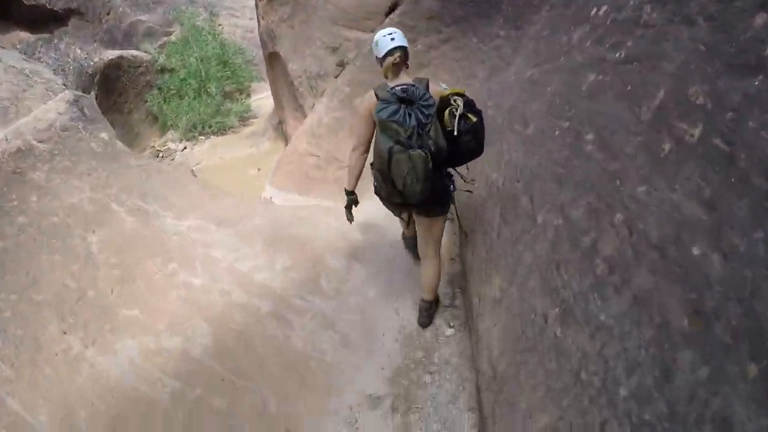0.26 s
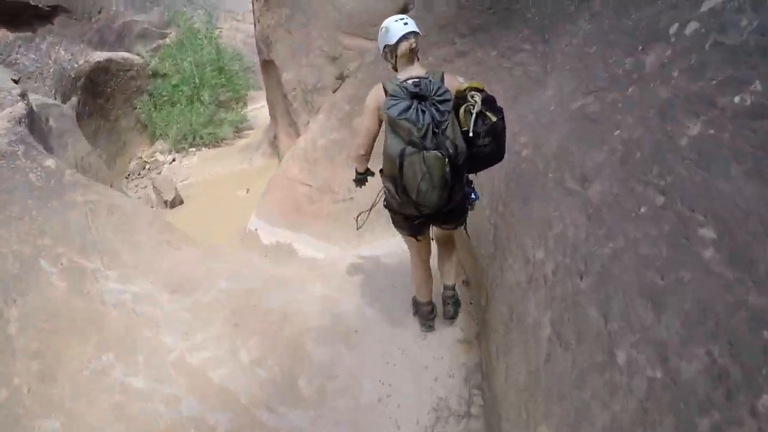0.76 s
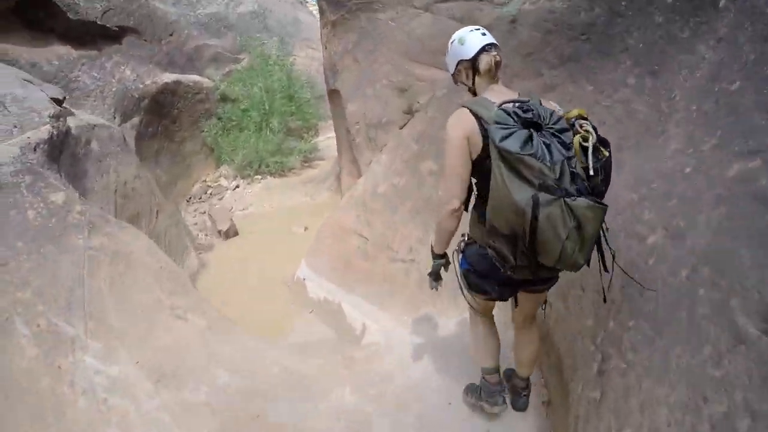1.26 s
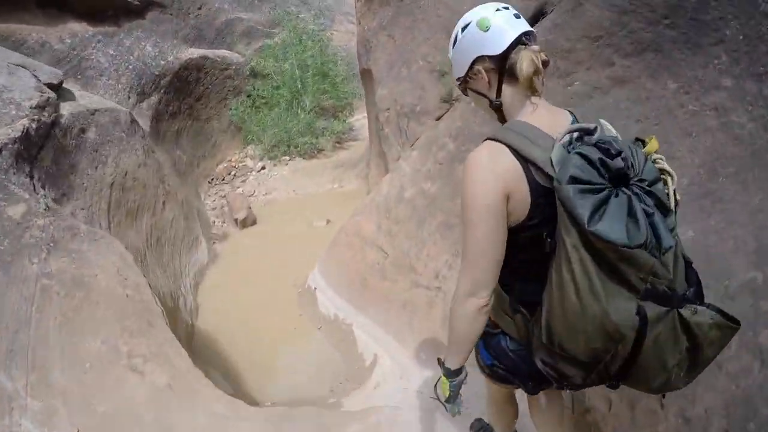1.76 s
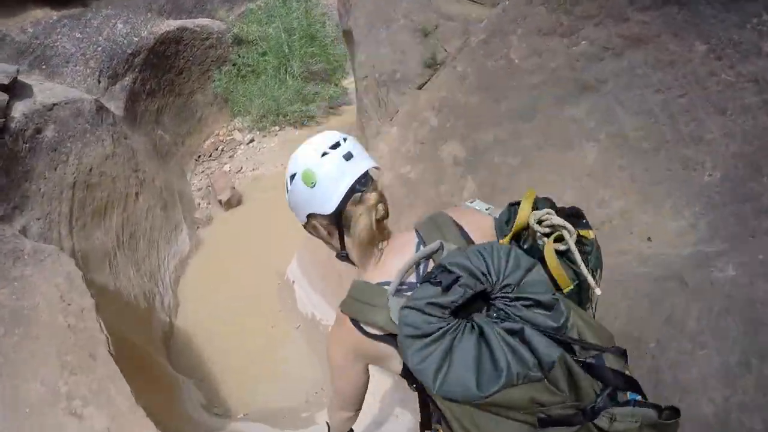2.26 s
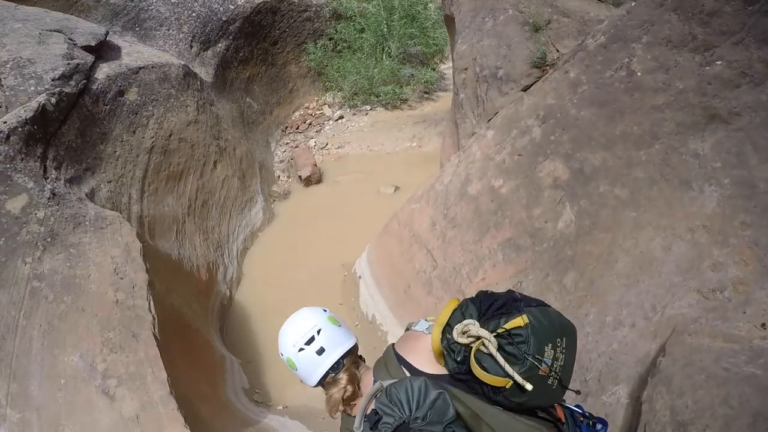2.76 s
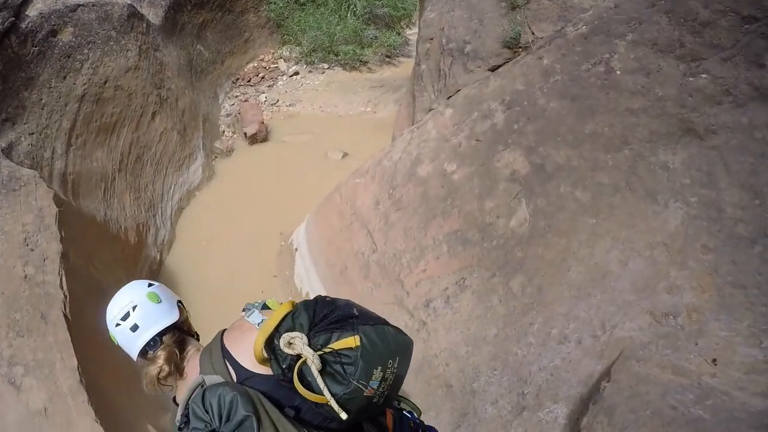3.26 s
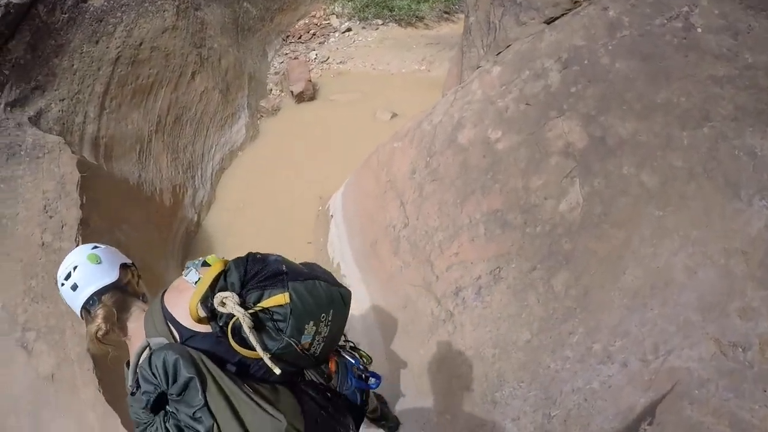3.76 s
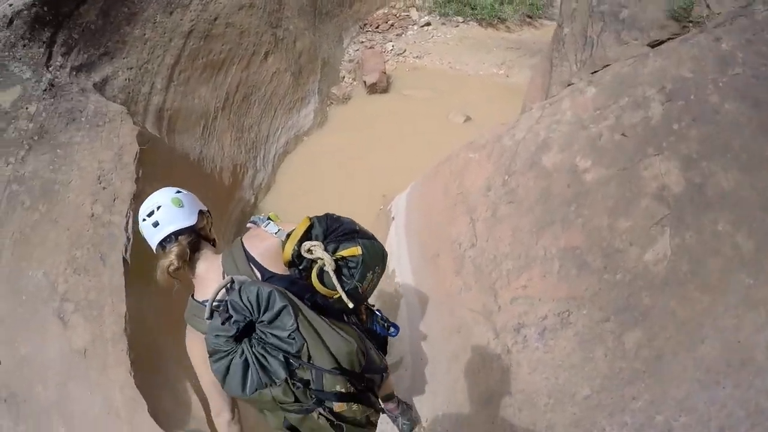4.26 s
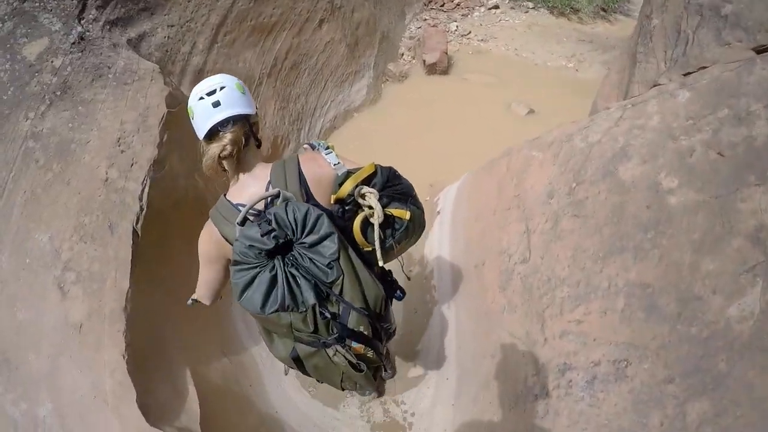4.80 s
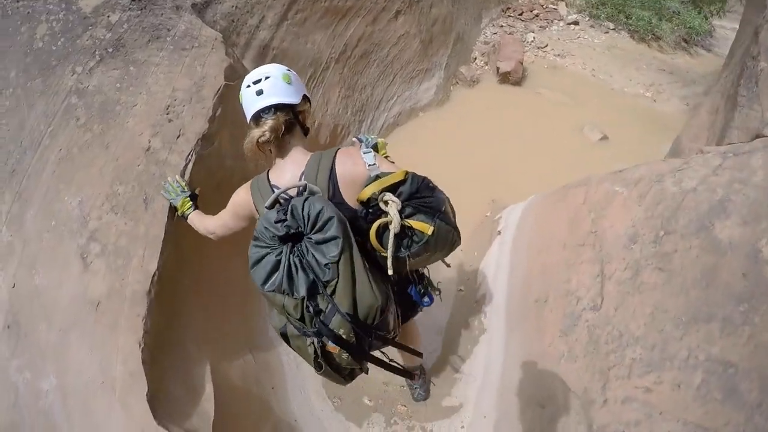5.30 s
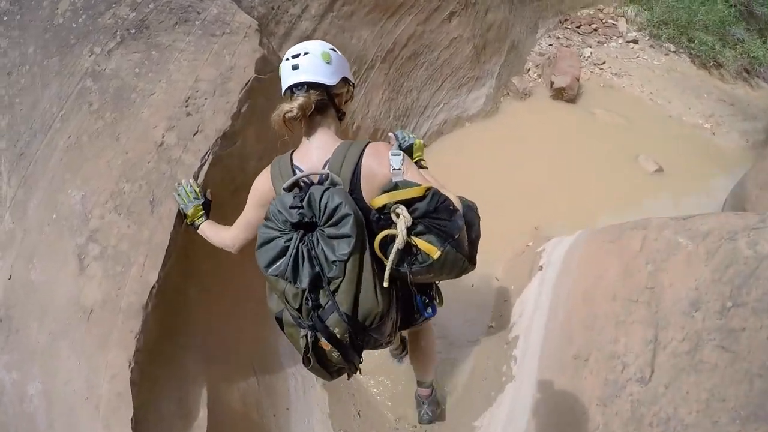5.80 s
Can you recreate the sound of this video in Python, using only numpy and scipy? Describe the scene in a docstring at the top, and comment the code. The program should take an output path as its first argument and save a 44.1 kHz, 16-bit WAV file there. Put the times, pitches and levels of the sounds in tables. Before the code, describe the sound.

Low footstep thumps and scuffing on rock, with a few gear clinks, light gravel crunches and faint bubbles near the end.

```python
"""Hikers in a sandstone canyon

Two hikers step down to a muddy pool, heard by a helmet camera in a closed housing. The wearer's footfalls
shake the mount at very low pitch. Friction of soles and packs, and small knocks, excite the housing's
resonances; metal gear clinks in its own modes, gravel crunches, and a few bubbles ring at the pool.
Under it all lie the canyon air and the hiss and whine of the electronics."""
import sys
import numpy as np
from scipy import signal
from scipy.fft import rfft, irfft
from scipy.io import wavfile
from scipy.ndimage import uniform_filter1d

SR = 44100
rng = np.random.default_rng(int(sys.argv[2]) if len(sys.argv) > 2 else 0)


def dump(signal):
    """Clip the signal to [-1, 1] and save it as 16-bit WAV at the path in sys.argv[1]."""
    limited = np.clip(np.atleast_2d(signal).T, -1, 1)
    pcm = np.round(limited * 32767).astype(np.int16)
    wavfile.write(sys.argv[1], SR, pcm)


N = 266364

# Jolts of the mount as the wearer lands or shifts weight. Each row: peak time in seconds, sway level
# in dB, sway pitch in Hz, rattle level in dB, sway decay time (t60, to fall 60 dB) in seconds.
MOUNT_JOLTS = [(0.0, -23.5, 31.4, -29, 0.27), (0.08, -35, 30.2, -57, 0.25), (0.16, -50, 28.9, -41.5, 0.078),
               (0.42, -51.5, 29.2, -59, 0.13), (0.553, -19, 28, -39, 0.45),
               (0.587, -13.5, 28.95, -27.5, 0.085), (0.79, -68, 29.73, -76, 0.35),
               (1.02, -51, 32.25, -48, 0.22), (1.113, -18.5, 30.4, -42, 0.28),
               (1.17, -22, 31.9, -25.5, 0.26), (1.39, -53, 35.1, -60, 0.35), (1.492, -39, 31.76, -37, 0.72),
               (1.595, -24, 32.2, -32.5, 0.28), (1.7, -20.5, 27.2, -39.5, 0.088),
               (1.94, -46, 29.12, -49, 0.32), (2.075, -32, 29.25, -46, 0.87),
               (2.146, -21, 28.2, -32.5, 0.13), (2.238, -27.5, 29.97, -64, 0.087),
               (2.439, -51, 29.37, -60, 0.15), (2.56, -48, 26.1, -56, 0.22), (2.692, -40, 26.6, -38.5, 0.4),
               (2.89, -60, 23.4, -57, 0.41), (3.088, -53, 27.94, -80, 0.2), (3.232, -63, 27.9, -43.5, 0.48),
               (3.351, -53.5, 26.2, -39.5, 0.35), (3.548, -29.5, 26.76, -43.5, 0.11),
               (3.666, -27.5, 25.02, -36, 0.048), (3.73, -36, 23.84, -48, 0.13),
               (3.969, -43, 28, -55, 0.069), (4.1, -31, 29.1, -37.5, 0.098), (4.21, -47, 29.73, -61, 0.47),
               (4.325, -38.5, 28, -54, 0.19), (4.608, -36.5, 29.7, -51, 0.19),
               (4.697, -13.5, 31.2, -26.5, 0.12), (4.978, -44, 31.43, -60, 0.056),
               (5.06, -41, 31.1, -59, 0.41), (5.165, -30, 31.05, -50, 0.083), (5.3, -51.5, 30.7, -54, 0.53),
               (5.43, -46.5, 28.68, -54, 0.31), (5.541, -42, 26.25, -39, 0.5),
               (5.68, -35.5, 24.84, -49, 0.072), (5.96, -44, 24.74, -84, 0.15)]
# Spectra of the mount's rattle, of grit, and of canyon air with microphone hiss.
# Each row: frequency in Hz, relative spectral density in dB.
RATTLE_SPECTRUM = [(38, -31), (48, 2), (65, -0.5), (90, -5), (110, -19.5), (130, -27), (200, -26)]
GRIT_SPECTRUM = [(4200, -6), (4500, 6), (5100, 5), (5600, 5), (6900, 4.5), (8300, 0.5), (11000, -5.5),
                 (14000, -16), (15500, -14)]
AIR_SPECTRUM = [(65, -56), (110, -3.5), (150, -6.5), (500, -20), (1130, -22), (1420, -34), (1790, -44),
                (2490, -68), (3190, -23.5), (4000, -44), (4720, -34), (8000, -39), (13200, -35),
                (15000, -40), (15700, -23)]
# Soles, cloth and packs rubbing on rock. Each row: time in seconds, then levels in dB of the body
# (middle and upper modes), the hollow modes and the treble.
RUB_LEVELS = [(0.0, -62, -62, -69.5), (0.2, -64, -74.5, -75.5), (0.27, -69, -70.5, -73),
              (0.41, -68.5, -80, -72), (0.5, -59.5, -62, -72), (0.66, -59.5, -64.5, -70.5),
              (0.9, -64.5, -70, -72.5), (0.99, -61.5, -67, -71), (1.2, -61.5, -62, -71),
              (1.32, -67.5, -71.5, -72.5), (1.56, -62.5, -66.5, -74.5), (1.72, -60, -61.5, -69),
              (1.9, -63.5, -76, -72.5), (2.03, -70.5, -73, -74), (2.09, -60, -66.5, -71.5),
              (2.27, -59.5, -63.5, -72), (2.55, -67, -73, -74.5), (2.76, -67.5, -70, -73),
              (2.9, -63, -66.5, -71.5), (2.98, -64, -71.5, -74.5), (3.13, -59, -63, -69.5),
              (3.22, -56, -62.5, -66.5), (3.32, -58.5, -64.5, -67.5), (3.42, -59.5, -70, -70.5),
              (3.47, -54, -60, -69), (3.55, -60, -71, -69), (3.65, -57, -60.5, -65.5),
              (3.7, -66.5, -72.5, -76), (4.3, -64.5, -70, -70.5), (4.36, -70, -85, -73),
              (4.41, -63, -67, -72.5), (4.6, -62.5, -68, -68), (4.77, -56.5, -61.5, -70.5),
              (4.84, -61.5, -67, -69.5), (4.97, -62, -71, -72), (5.15, -59.5, -67, -70),
              (5.33, -62, -68.5, -73.5), (5.38, -70, -71.5, -72.5), (5.497, -65.5, -63.5, -75),
              (5.51, -55, -60.5, -66.5), (5.575, -55.5, -65.5, -69.5), (5.6, -63.5, -66, -71.5),
              (5.974, -66, -70.5, -74), (5.984, -57, -78, -67.5), (6.04, -56, -62, -69)]
# Division of the rubbing's body power. Each row: time in seconds, fraction in the upper modes,
# fraction of that in the top two.
RUB_SHARES = [(0, 0.6, 0.4), (.5, 0.58, 0.27), (.9, 0.59, 0.27), (1.3, 0.6, 0.3), (1.7, 0.45, .35),
              (2.1, 0.47, 0.32), (2.6, 0.5, 0.32), (3.0, 0.52, 0.32), (3.2, 0.5, 0.28), (3.35, 0.5, 0.22),
              (3.5, .5, 0.26), (3.65, 0.55, 0.36), (3.8, .44, .3), (4.2, 0.58, 0.39), (4.6, 0.55, 0.5),
              (4.77, 0.63, 0.22), (4.9, 0.57, 0.42), (5.15, 0.56, 0.36), (5.4, .55, 0.35),
              (5.55, 0.49, 0.37), (5.7, 0.53, 0.27), (5.95, .6, 0.41), (6.04, 0.59, .45)]
# Resonances of the housing. Each row: frequency in Hz, nominal width in Hz, relative gain in dB.
HOLLOW_MODES = [(359, 270, -1), (629, 55, -1), (878, 305, 2.5), (1265, 84, 4.5)]
MIDDLE_MODES = [(1568, 128, 6), (1823, 217, 8.5), (2124, 117, 6)]
UPPER_MODES = [(2490, 280, 6), (2780, 374, 3), (3567, 430, 4), (4000, 344, 3.5)]
# Heel taps, stones and strap snaps. Each row: start in seconds, level in dB before the mixing gains,
# centre in Hz, t60 in seconds, offsets in dB of the hollow part and of the treble.
IMPACTS = [(0.2154, -49, 2960, 0.034, -10, 3.5), (0.328, -49.5, 2370, 0.026, -12, -16),
           (0.752, -51, 2480, 0.023, 7.5, -16), (1.8179, -48, 1480, 0.038, -2, -25),
           (1.831, -49, 3544, 0.017, -12, 8), (3.9372, -48, 2940, 0.035, -26, -20),
           (4.146, -47, 3830, 0.058, -14, -17), (0.4564, -48.5, 1774, 0.028, -4, -17),
           (0.533, -37.5, 1955, 0.14, -3.5, -12), (0.6383, -42.5, 1840, 0.24, -5, -22),
           (1.0144, -43.5, 2320, 0.022, -16, -9), (1.0992, -31.5, 2800, 0.033, -5.5, -24),
           (1.14, -43, 2534, 0.11, -6, -7), (1.19, -51, 3000, 0.043, -11, -15),
           (1.2007, -45.5, 3560, 0.074, -7, -12), (1.217, -58, 1800, 0.025, 8, -20),
           (1.229, -48, 3020, 0.09, -7, -7), (1.564, -35.5, 2720, 0.074, -11, -11),
           (1.57, -34, 2180, 0.055, -17, -9), (1.594, -40.5, 1720, 0.095, -5, -11),
           (1.7766, -39.5, 2490, 0.048, -7.5, -23), (2.0777, -42.5, 1670, 0.13, -6, -5),
           (2.103, -41, 2300, 0.042, -10, -15), (2.14, -45, 1875, 0.043, -27, -8),
           (2.2292, -42.5, 1847, 0.095, -23, -6), (2.4178, -43.5, 1520, 0.1, -4, -14),
           (2.484, -43.5, 2510, 0.064, -21, -5), (2.501, -44.5, 2986, 0.069, -20, -8),
           (2.258, -43.5, 2830, 0.057, -6, -15), (2.6564, -44.5, 2454, 0.061, -3.5, -11),
           (2.679, -41.5, 2370, 0.11, -20, -7), (2.671, -36, 2270, 0.042, -8, -10),
           (2.8108, -59.5, 1960, 0.029, 10.5, -13), (2.909, -67, 1886, 0.071, 3, -13),
           (2.866, -44.5, 2094, 0.065, -4.5, -8), (3.449, -42, 2900, 0.1, -18, -24),
           (3.464, -41.5, 2000, 0.087, -7.5, -26), (3.49, -47, 3950, .07, -27, -11),
           (3.21, -42, 4040, .07, -28, -20), (3.585, -43, 2100, 0.094, -18, -25),
           (3.6016, -42.5, 2500, 0.092, -19, 0.5), (3.669, -53, 2133, 0.068, -10, 6),
           (4.064, -50, 2430, 0.051, -1, -0.5), (4.2728, -47.5, 3790, 0.026, -11, -5),
           (4.3193, -43.5, 3470, 0.062, -12, -12), (4.3993, -45, 3000, 0.063, -5.5, -2),
           (4.594, -41, 3050, 0.066, -10, -9), (4.6179, -40.5, 2866, 0.12, -14, -24),
           (4.649, -39.5, 1840, 0.068, -8, -18), (4.6685, -34, 2502, 0.022, -6.5, -24),
           (4.73, -43, 2500, 0.17, -30, -30), (4.751, -39, 2690, 0.15, -33, -34),
           (4.8552, -41, 2520, 0.055, -28, -18), (4.87, -41.5, 3950, 0.075, -23, -20),
           (4.699, -44, 3400, 0.058, -17, -20), (5.1433, -43, 2320, 0.15, -10, -33),
           (5.2474, -42, 1540, 0.048, -13, -18), (5.344, -43.5, 1570, 0.051, -9, -28),
           (5.502, -47, 2580, 0.049, -6, -5), (5.529, -40, 2600, 0.047, -14, -20),
           (5.561, -42, 2398, 0.056, -20, -20), (5.9804, -38, 2924, 0.031, -21, -22)]
# Metal gear touching on a harness. Each row: start in seconds, strike level in dB, ring (0 large piece,
# 1 small piece, 2 large piece at another spot), dB by which the spot alternately lifts and lowers modes.
GEAR_TOUCHES = [(0.217, -44, 0, 1), (0.727, -51, 1, -3), (0.752, -31.5, 2, -0.5), (1.727, -37, 1, 2),
                (1.753, -49, 1, 2), (1.8323, -33.5, 0, -1), (2.23, -52, 1, 4), (4.274, -46, 1, -7)]
# Modes of two metal pieces; the larger rings differently when struck at another spot.
# Each entry: frequency in Hz.
LARGE_GEAR_HZ = [3560, 3830, 5390, 6060, 6815, 8245, 10925, 12430, 13300]
SMALL_GEAR_HZ = [6500, 6800, 10700]
LARGE_OTHER_SPOT_HZ = [3500, 3760, 5340, 6480, 6680, 8180, 10900, 12440, 13300]
# Ringing of those same modes. Each row: relative level in dB, t60 in seconds.
LARGE_GEAR_RING = [(-11, .025), (-11, .055), (-14, .03), (-10, .045), (-12, .045), (-7, .022), (-27, .15),
                   (-35, .04), (-23, .015)]
SMALL_GEAR_RING = [(-9, .022), (-12, .025), (-13, .028)]
LARGE_OTHER_SPOT_RING = [(-15, .09), (-9, .03), (-14, .035), (-14, .02), (-11, .028), (-17, .04),
                         (-26, .06), (-22, .07), (-16, .012)]
# Fine gravel crushed under a sole. Each row: start in seconds, level in dB, t60 in seconds, centre in Hz.
GRAVEL_BURSTS = [(.545, -72, 0.22, 10300), (.595, -65, .08, 10300), (1.13, -61, 0.086, 10300),
                 (1.141, -53, 0.05, 7350), (1.2, -54, 0.025, 5600), (1.2605, -56, 0.023, 7200),
                 (4.535, -63, .1, 10580), (4.695, -64, .07, 10390), (5.2, -61, 0.025, 10240),
                 (5.295, -64, 0.039, 10300), (5.578, -66, 0.043, 10300)]
# Bubbles and drops as a foot meets the pool. Each row: start in seconds, level in dB, starting pitch
# in Hz, t60 in seconds (capped at 0.05), glide as a fraction of that pitch per second.
POOL_BUBBLES = [(5.426, -50.5, 2380, 0.044, 31), (5.813, -54.5, 954, 0.051, 9),
                (5.832, -54.5, 4180, 0.025, -2), (5.846, -50.5, 2760, 0.021, 3),
                (5.963, -55, 3200, .025, 12)]


def amp(db):
    """Amplitude grows tenfold for every 20 dB."""
    return 10 ** (np.asarray(db) / 20)


def unit_rms(x):
    """Normalisation to a mean power of 1."""
    return x / np.sqrt(np.mean(x ** 2) + 1e-20)


def curves(rows):
    """Linear interpolation of each column over the times in the first."""
    times, *columns = np.transpose(rows)
    return [np.interp(np.arange(N) / SR, times, column) for column in columns]


def add(mix, start, sound):
    """Superposition of a sound on the mix, from a start in seconds."""
    part = mix[round(start * SR):][:len(sound)]
    part += sound[:len(part)]


def flicker(span_s):
    """Low-pass noise of rms 1: two moving averages make it vary over span_s."""
    size = round(span_s * SR)
    return unit_rms(uniform_filter1d(uniform_filter1d(rng.standard_normal(N), size), size))


def coloured(x, spectrum):
    """Filtering by multiplication of spectra; silent beyond the table's ends."""
    hz, db = np.transpose(spectrum)
    bins_hz = np.fft.rfftfreq(len(x), 1 / SR)
    gain = amp(np.interp(np.log(bins_hz + 1), np.log(hz), db, -120, -120))
    return irfft(rfft(x) * gain, len(x))


def resonate(x, hz, width_hz):
    """Resonance by heterodyning: shift hz down to zero, smooth twice, shift back."""
    carrier = np.exp(2j * np.pi * hz * np.arange(1, len(x) + 1) / SR)
    pole = np.exp(-np.pi * width_hz / SR)
    smoothed = signal.lfilter([(1 - pole) ** 2], [1, -2 * pole, pole ** 2], x / carrier)
    return 2 * (carrier * smoothed).real


def jolt_envelope(times, peaks_db, t60, rise_db_per_s, curve, rest_db):
    """Blows add in power over a resting level; with curve above 1 each holds, then stops short."""
    t = np.arange(0, N + 64, 64) / SR
    age = t - times[:, None]
    decay_db = -60 * (abs(age) / np.reshape(t60, (-1, 1))) ** curve
    db = peaks_db[:, None] + np.where(age < 0, rise_db_per_s * age, decay_db)
    blows = np.sqrt((amp(db) ** 2).sum(0) + 1e-12)
    return np.interp(np.arange(N) / SR, t, blows) + amp(rest_db + 2.6 * flicker(0.039))


def mount_shake():
    """Damped vibration: each jolt sets off a wavering sway, with a rougher rattle above it."""
    times, sway_db, pitch_hz, rattle_db, t60 = np.transpose(MOUNT_JOLTS)
    hz = np.interp(np.arange(N) / SR, times, pitch_hz) * (1 + 0.1177 * flicker(0.035))
    sway = np.sqrt(2) * np.sin(2 * np.pi * (np.cumsum(hz) / SR + rng.random()))
    sway *= jolt_envelope(times, sway_db, t60, rise_db_per_s=557, curve=1.7, rest_db=-55)
    rattle = coloured(rng.standard_normal(N), RATTLE_SPECTRUM)
    local_rms = np.sqrt(uniform_filter1d(uniform_filter1d(rattle ** 2, 900), 900) + 1e-20)
    rattle = unit_rms(rattle / local_rms ** 1.45)  # no jolt is lost in a chance lull of the noise
    rattle *= jolt_envelope(times - 0.02, rattle_db, t60=0.35, rise_db_per_s=607,
                            curve=0.88, rest_db=-55.5)
    strap = signal.butter(4, 125, fs=SR, output="sos")  # the padded strap passes only slow motion
    return signal.sosfiltfilt(strap, sway + rattle)


def housing(x, modes):
    """Convolution with the shell's modal impulse response; white noise keeps its power."""
    click = signal.unit_impulse(4096)
    response = sum(amp(db) * resonate(click, hz, 1.48 * width) for hz, width, db in modes)
    return signal.oaconvolve(x, response / np.linalg.norm(response))[:N]


def rubbed(level, modes, wander_db=1.8):
    """Forced vibration: friction noise drives each mode harder or softer as the contact moves."""
    weights = np.array([amp(db) * np.sqrt(width) for hz, width, db in modes])
    out = np.zeros(N)
    for weight, mode in zip(weights / np.linalg.norm(weights), modes):
        friction = level * rng.standard_normal(N) * amp(wander_db * flicker(0.06))
        out += weight * housing(friction, [mode])
    return out


def scuffs(grains_per_s=150, catches_per_s=20, catch_rise_s=0.005):
    """Sliding friction: soles and cloth slip and catch, modulating noise in four bands."""
    body_db, hollow_db, treble_db = curves(RUB_LEVELS)
    upper_share, top_share = curves(RUB_SHARES)
    grains = (rng.random(N) < grains_per_s / SR) * amp(4.9 * np.minimum(rng.exponential(1, N), 5))
    slips = (1 + 0.056 * uniform_filter1d(unit_rms(grains), 80)) * amp(0.78 * flicker(0.034))
    onsets = (rng.random((4, N)) < catches_per_s / SR) * amp(-5 - 12 * rng.random((4, N)))
    age = np.arange(4000) / (catch_rise_s * SR)
    catches = signal.oaconvolve(onsets, (age * np.exp(1 - age))[None], axes=1)[:, :N]
    drives = [(slips + catch) * amp(0.8 * flicker(0.039)) for catch in catches]
    middle_drive, upper_drive, hollow_drive, treble_drive = drives
    upper_share = np.clip(upper_share + 0.032 * flicker(0.025), 0.05, 0.95)
    middle = rubbed(middle_drive * amp(body_db) * np.sqrt(1 - upper_share), MIDDLE_MODES)
    upper_level = upper_drive * amp(body_db) * np.sqrt(upper_share)
    upper = rubbed(upper_level * np.sqrt(1 - top_share), UPPER_MODES[:2])
    top = rubbed(upper_level * np.sqrt(top_share), UPPER_MODES[2:])
    hollow = rubbed(hollow_drive * amp(hollow_db), HOLLOW_MODES)
    grit_response = unit_rms(coloured(signal.unit_impulse(N), GRIT_SPECTRUM)) / np.sqrt(N)
    grit_noise = treble_drive * rng.standard_normal(N) * amp(treble_db)
    treble = irfft(rfft(grit_noise) * rfft(grit_response), N)
    return hollow + middle + upper + top + treble


def air():
    """Broadband noise of canyon air and microphone hiss, wavering slightly in level."""
    return amp(-62.5 + 0.5 * flicker(0.033)) * unit_rms(coloured(rng.standard_normal(N), AIR_SPECTRUM))


def sensor_whine(hz=14166, frame_hz=30000 / 1001, on=0.17, off=0.71):
    """Electrical crosstalk: the image sensor's read-out leaks a tone for part of every frame."""
    frame_phase = (np.arange(N) / SR * frame_hz) % 1
    gate = np.clip(np.minimum(frame_phase - on, off - frame_phase) / 0.03 + 0.5, 0, 1)
    return amp(-73) * np.sqrt(2) * gate * np.sin(2 * np.pi * hz * frame_phase / frame_hz)


def knocks(softness_per_s=0.59, contact_t60=0.006):
    """Impact excitation: a burst of noise rings the housing, and a treble tick sounds with it."""
    body, hollow, ticks = np.zeros((3, N))
    t = np.arange(8000) / SR
    for start, db, hz, t60, hollow_db, treble_db in IMPACTS:
        body_noise, hollow_noise, tick_noise = rng.standard_normal((3, len(t)))
        rise_s = softness_per_s * t60 ** 2  # long knocks are soft drags, short ones sharp taps
        envelope = amp(db - 60 * t / t60) * np.minimum(t / rise_s, 1)
        if t60 < 0.055:  # hard first contact
            envelope += amp(db - 5 - 60 * t / contact_t60)
        width_hz = 2400 * min(0.07 / t60, 1)  # long knocks are narrower in colour
        add(body, start, envelope * unit_rms(resonate(body_noise, hz, width_hz)))
        add(hollow, start, amp(hollow_db) * envelope * hollow_noise)
        tick = unit_rms(resonate(tick_noise, hz=4600, width_hz=3900))
        add(ticks, start, amp(treble_db - 30 * t / t60) * envelope * tick)
    return (amp(-16.5) * housing(body, MIDDLE_MODES + UPPER_MODES)
            + amp(-4) * housing(hollow, HOLLOW_MODES) + amp(-7) * ticks)


def gear_clinks(rise_s=0.001, chatter_t60=0.024):
    """Free vibration: a brief chatter of contacts rings the inharmonic modes of one metal piece."""
    out, t = np.zeros(N), np.arange(8000) / SR
    mode_sets = [(LARGE_GEAR_HZ, LARGE_GEAR_RING), (SMALL_GEAR_HZ, SMALL_GEAR_RING),
                 (LARGE_OTHER_SPOT_HZ, LARGE_OTHER_SPOT_RING)]
    phases = rng.random((len(GEAR_TOUCHES), len(LARGE_GEAR_HZ)))
    chatters = rng.standard_normal((len(GEAR_TOUCHES), 400)) * amp(-60 * t[:400] / chatter_t60)
    for (start, db, mode_set, spot_db), phase, chatter in zip(GEAR_TOUCHES, phases, chatters):
        ring = np.zeros(len(t))
        for k, (hz, (mode_db, t60)) in enumerate(zip(*mode_sets[mode_set])):
            decay = amp(mode_db + spot_db * (-1) ** k - 60 * t / t60)
            ring += decay * np.sin(2 * np.pi * (hz * t + phase[k]))
        ring *= amp(db) * np.minimum(t / rise_s, 1)
        chattered = np.convolve(ring, chatter / np.linalg.norm(chatter))[:len(t)]
        add(out, start, 0.9 * ring + 0.4 * chattered)
        if mode_set != 1:  # the larger piece clacks at first touch
            add(out, start, amp(db - 8) * resonate(chatter, hz=5600, width_hz=4000))
    return out


def gravel_crunches(rise_s=0.0012):
    """Crushed grit radiates short, bright noise bursts, narrower in band at lower pitch."""
    out, t = np.zeros(N), np.arange(8000) / SR
    for start, db, t60, hz in GRAVEL_BURSTS:
        grit = unit_rms(resonate(rng.standard_normal(len(t)), hz, width_hz=0.7 * hz ** 2 / 10000))
        add(out, start, amp(db - 60 * t / t60) * np.minimum(t / rise_s, 1) * grit)
    return out


def bubbles(rise_s=0.0015, roughness=0.8):
    """Bubble resonance: trapped air rings in a short, rough tone that glides as it nears the surface."""
    out, t = np.zeros(N), np.arange(4000) / SR
    for start, db, hz, t60, glide in POOL_BUBBLES:
        tone = np.sin(2 * np.pi * hz * (t + glide * t ** 2 / 2))
        flutter = 1 + roughness * unit_rms(uniform_filter1d(rng.standard_normal(len(t)), 30))
        envelope = amp(db - 60 * t / min(t60, 0.05)) * np.minimum(t / rise_s, 1)
        add(out, start, envelope * tone * flutter)
    return out


def scene():
    """Superposition of all sources in one channel."""
    hikers = mount_shake() + scuffs() + knocks() + gravel_crunches() + bubbles() + gear_clinks()
    return (hikers + air() + sensor_whine())[None]


def record(dry):
    """Band limiting by a steep linear-phase low-pass filter."""
    low_pass = signal.firwin(1023, cutoff=15300, window=("kaiser", 9), fs=SR)
    return signal.oaconvolve(dry, low_pass[None], "same")


dry = scene()
out = record(dry)
dump(out)
```